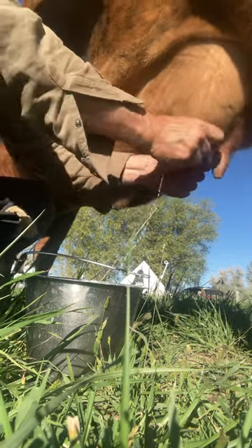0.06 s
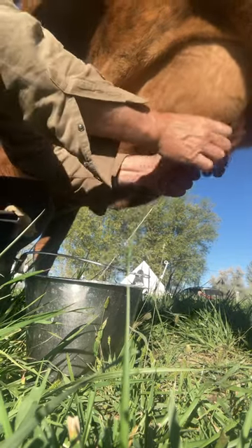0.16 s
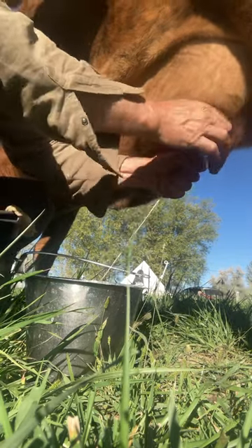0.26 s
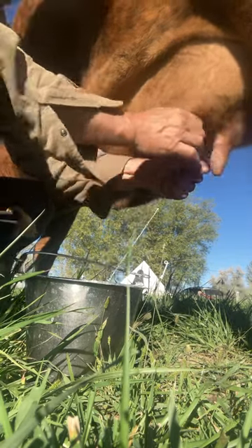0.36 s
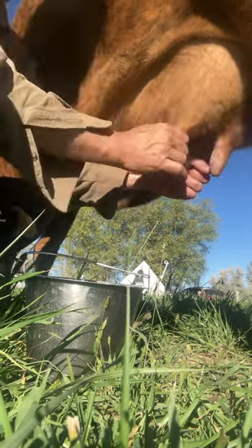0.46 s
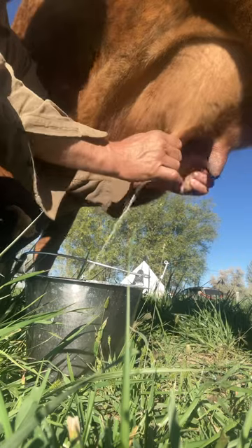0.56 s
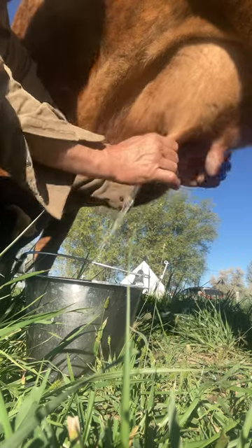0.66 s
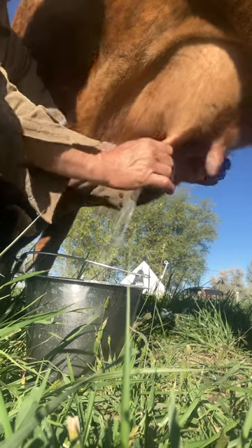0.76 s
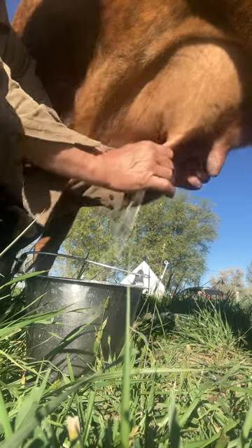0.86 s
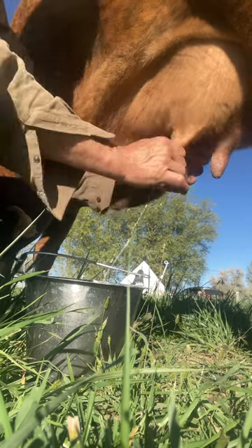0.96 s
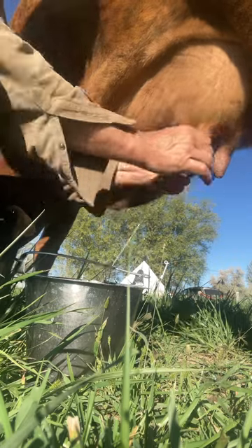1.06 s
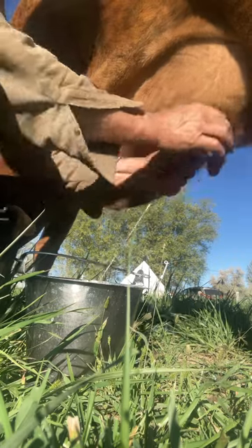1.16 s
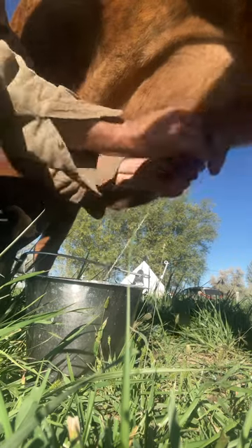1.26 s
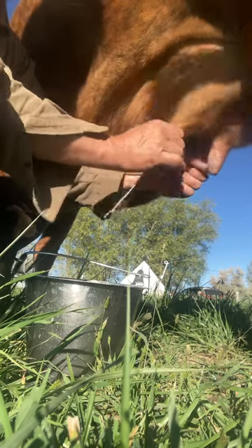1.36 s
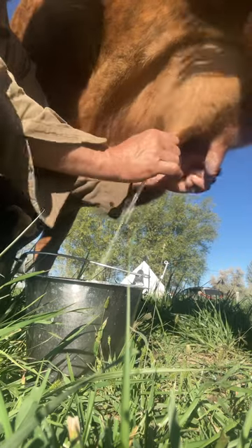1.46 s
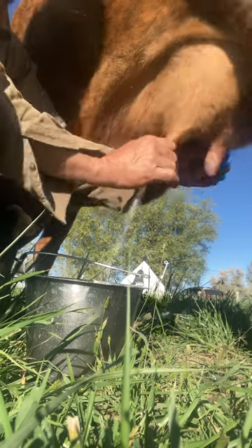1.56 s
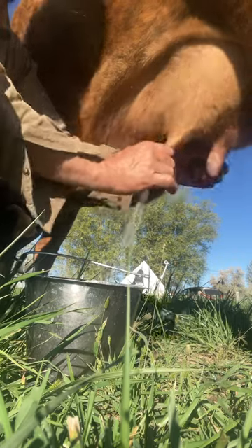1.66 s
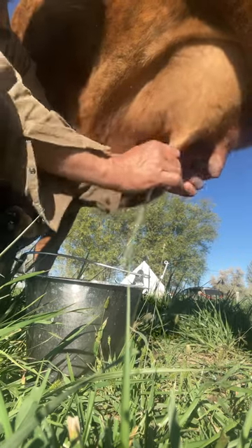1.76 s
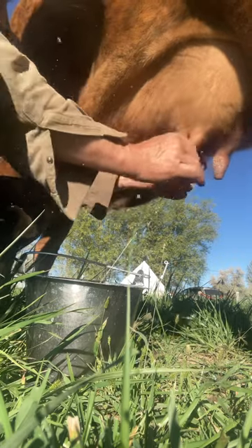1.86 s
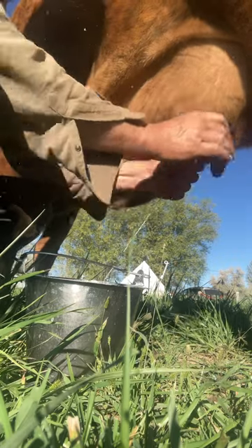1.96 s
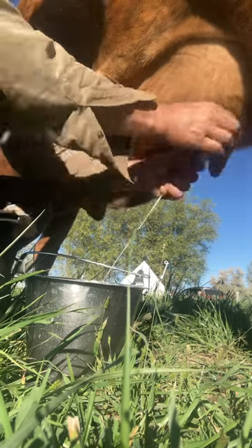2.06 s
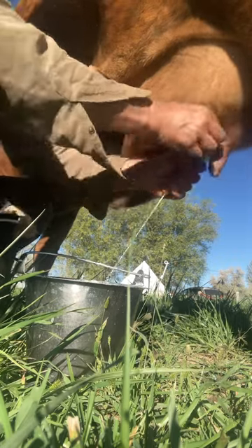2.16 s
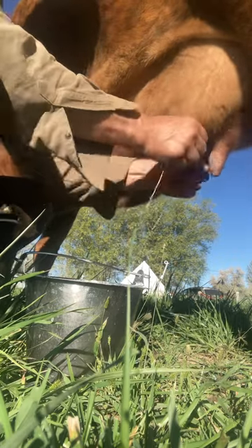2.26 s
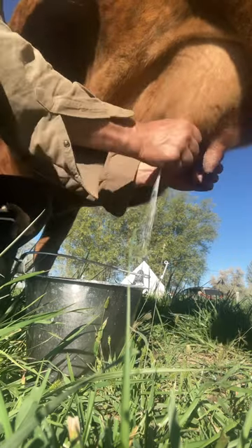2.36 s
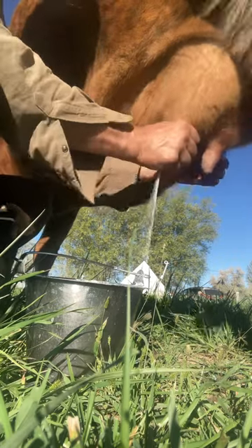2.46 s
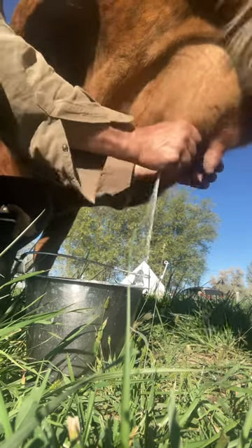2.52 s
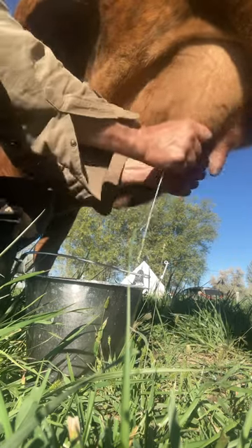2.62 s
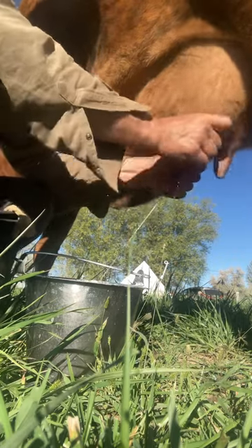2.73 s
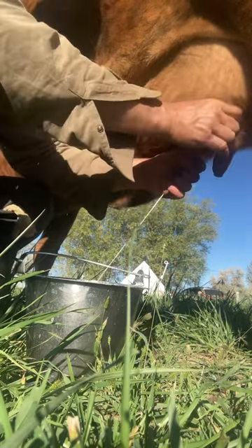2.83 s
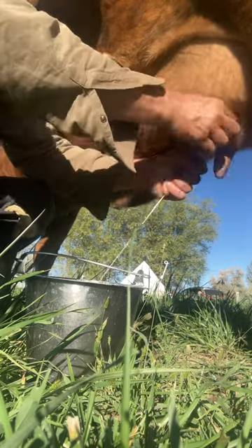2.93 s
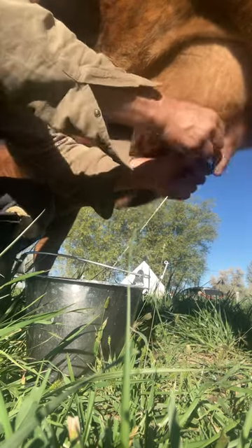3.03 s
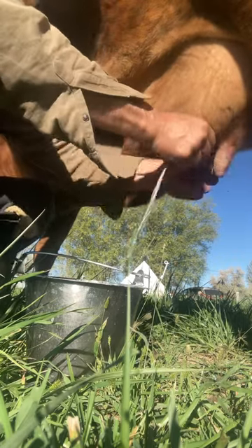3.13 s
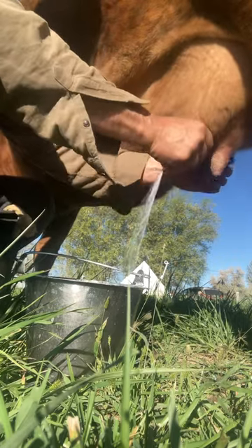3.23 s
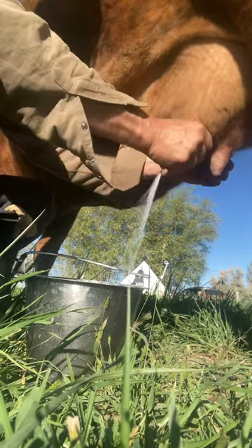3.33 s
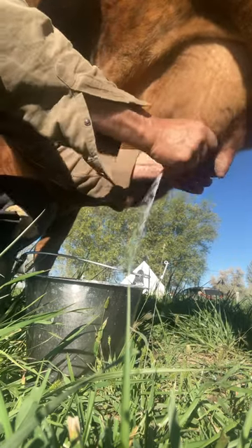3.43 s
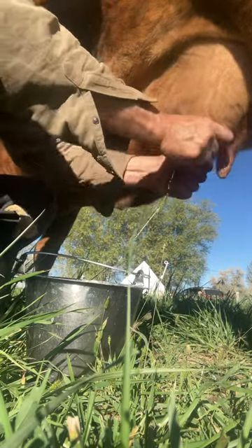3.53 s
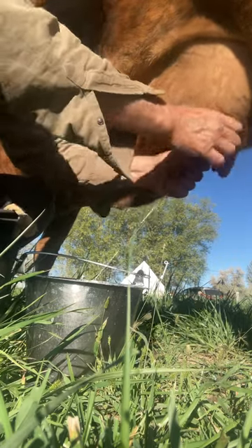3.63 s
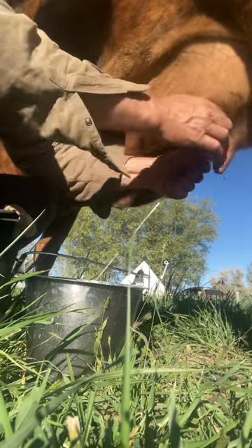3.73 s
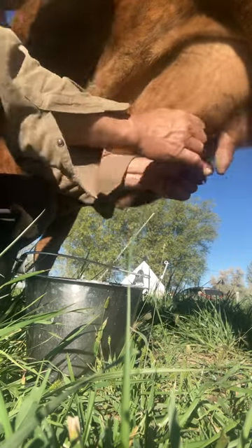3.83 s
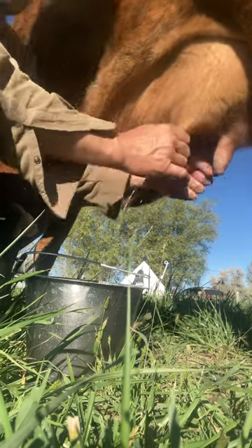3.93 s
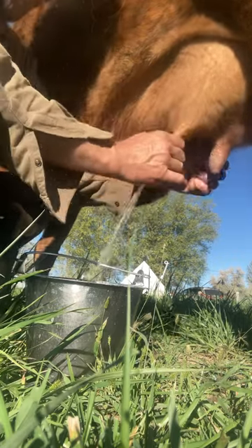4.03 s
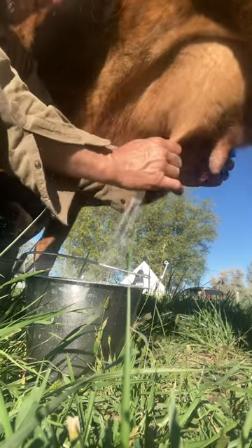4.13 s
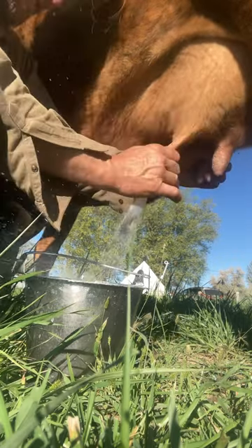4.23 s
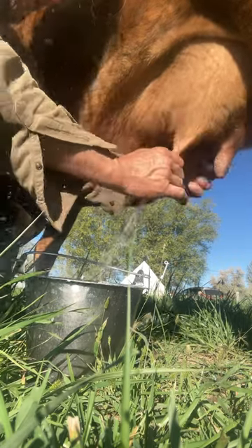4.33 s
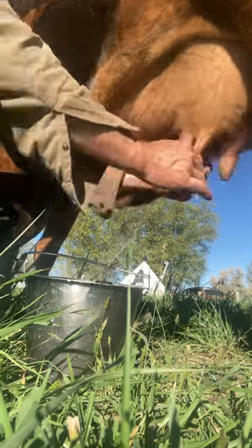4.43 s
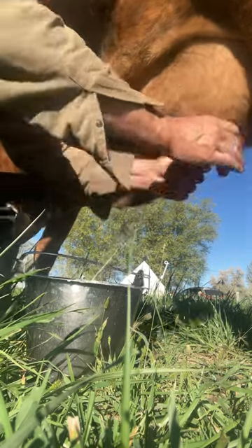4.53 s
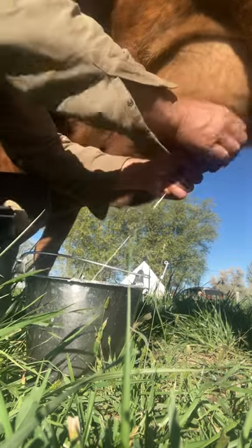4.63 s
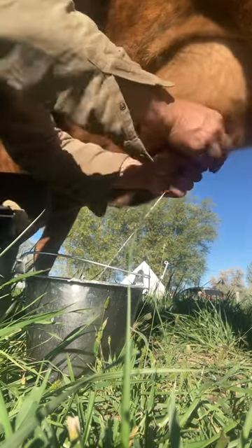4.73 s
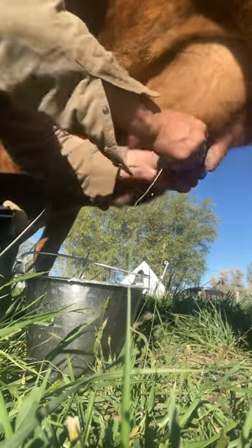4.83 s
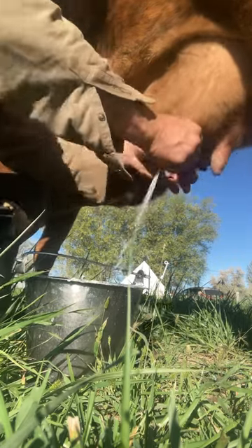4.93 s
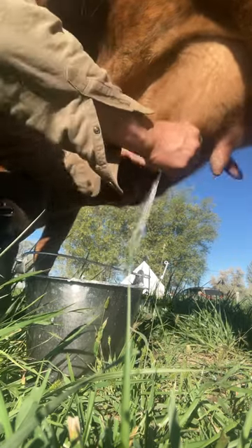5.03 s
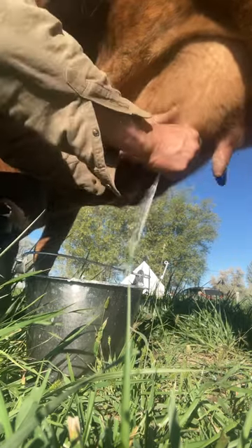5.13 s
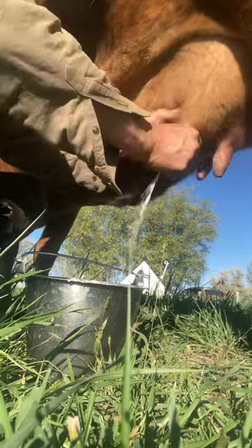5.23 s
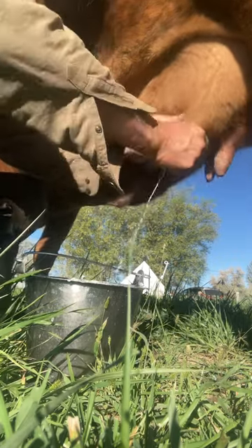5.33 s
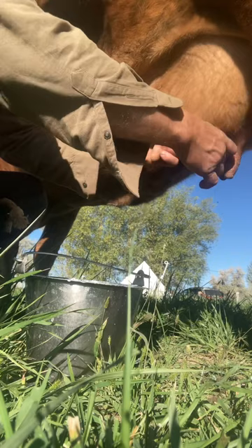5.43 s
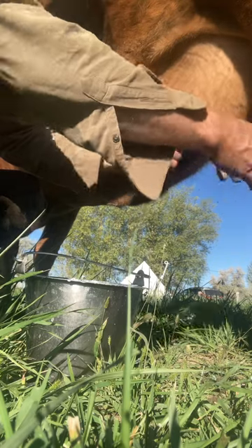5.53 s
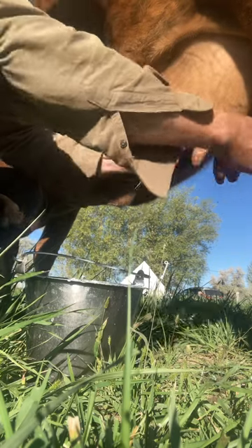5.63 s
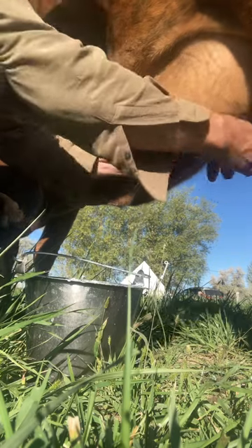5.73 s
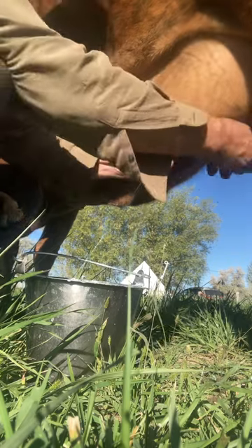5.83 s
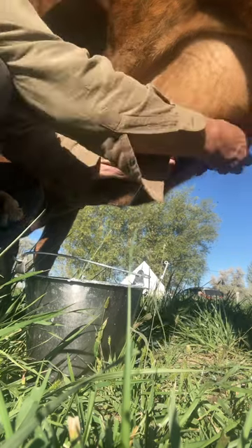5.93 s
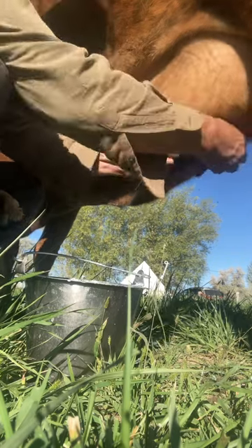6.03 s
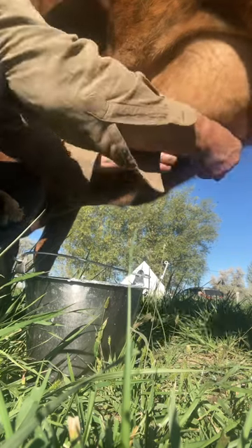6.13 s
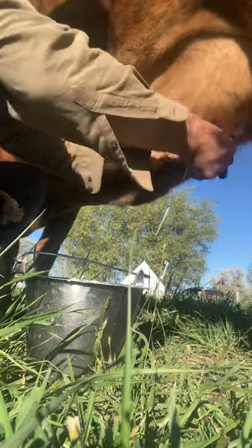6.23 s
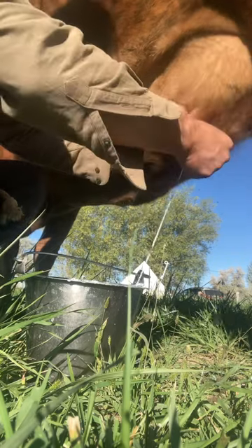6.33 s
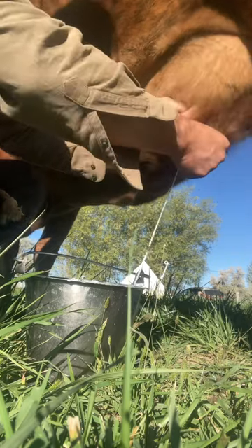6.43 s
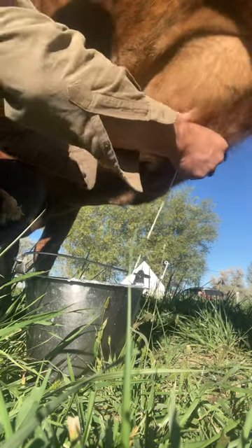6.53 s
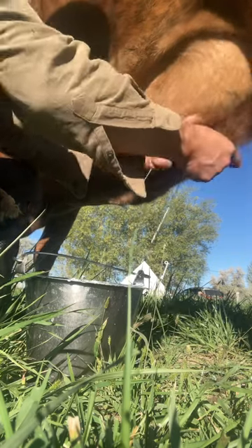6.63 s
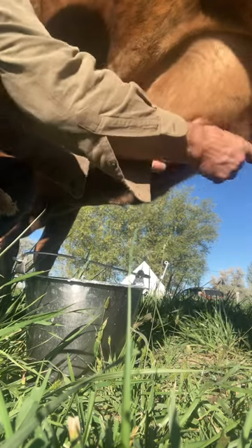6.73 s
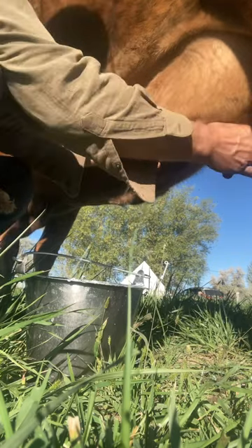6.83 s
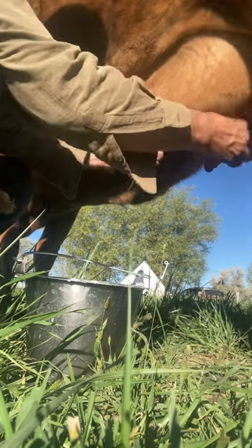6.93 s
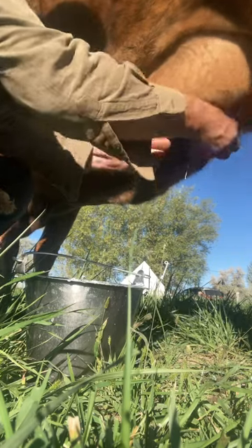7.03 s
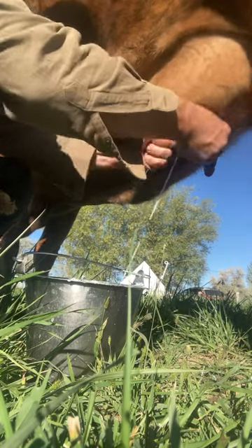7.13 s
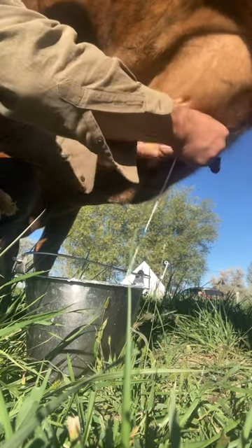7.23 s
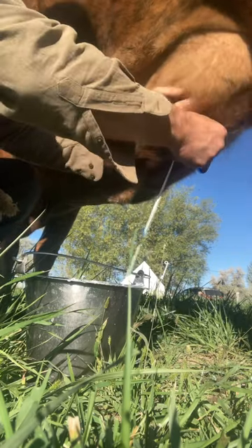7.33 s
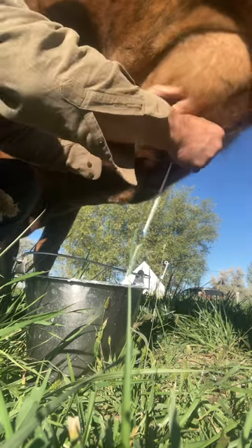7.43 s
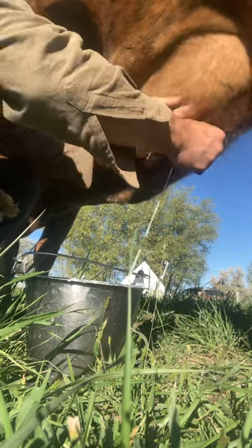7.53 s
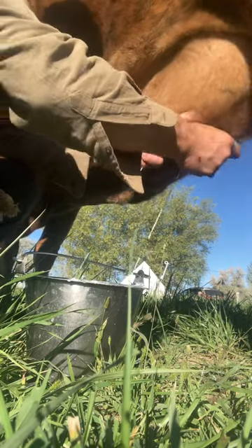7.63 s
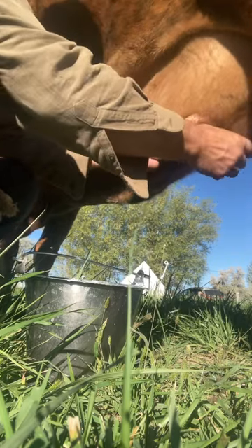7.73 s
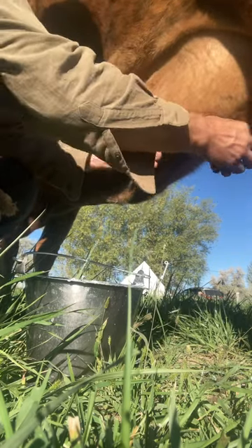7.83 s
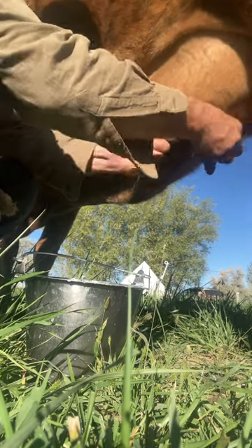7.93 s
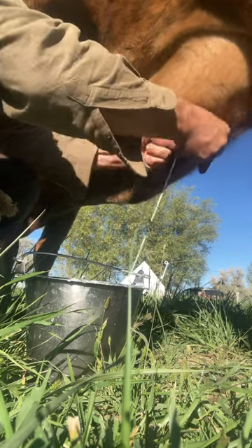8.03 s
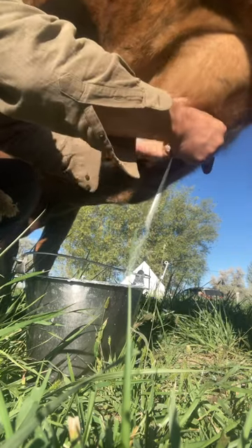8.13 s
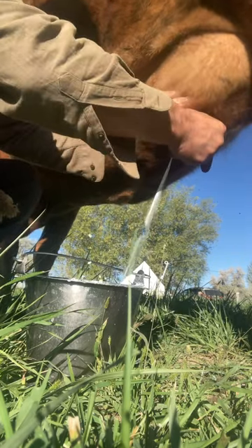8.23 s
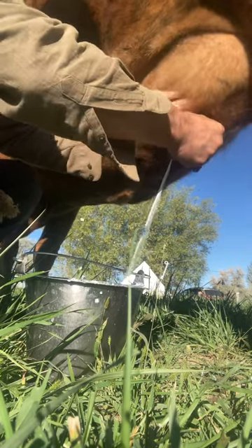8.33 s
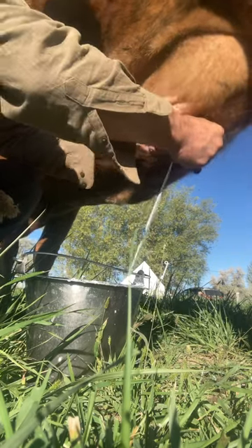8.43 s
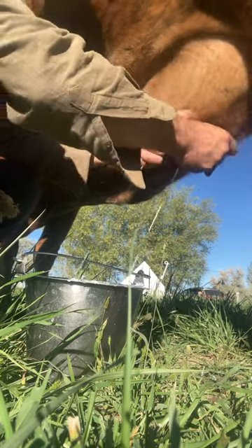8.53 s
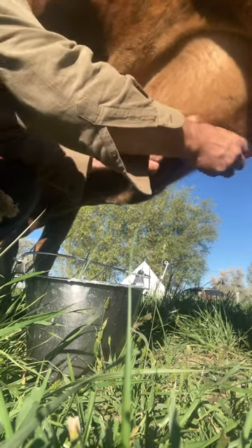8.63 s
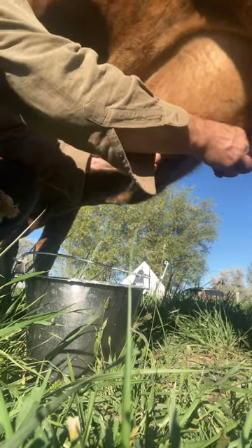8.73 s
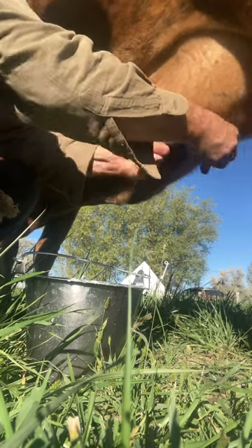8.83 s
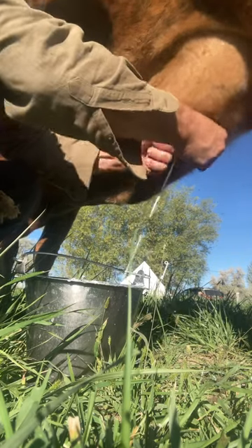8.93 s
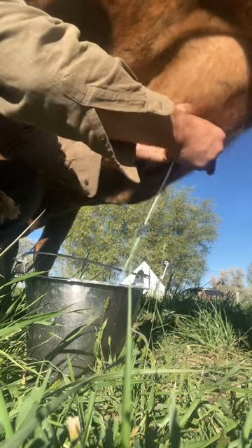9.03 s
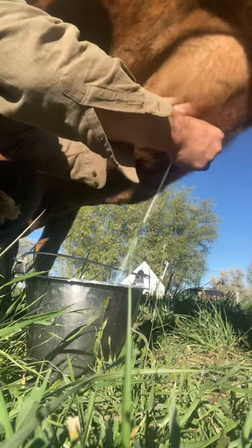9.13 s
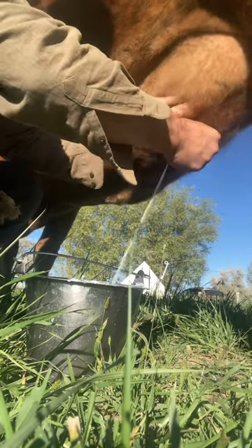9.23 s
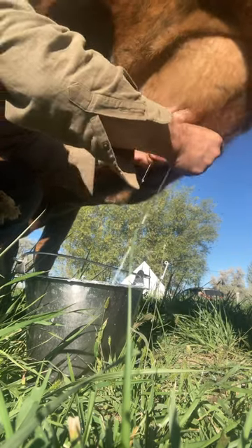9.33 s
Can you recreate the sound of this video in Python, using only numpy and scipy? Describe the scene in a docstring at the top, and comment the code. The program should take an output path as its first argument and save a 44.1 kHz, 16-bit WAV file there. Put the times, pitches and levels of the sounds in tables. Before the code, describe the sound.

Streams of milk squirt in steady alternating pulls into a metal pail, hissing and splashing, over a faint low outdoor rumble.

```python
"""Hand milking on a pasture

A cow is milked by hand into a steel pail, heard from a stereo microphone close by in the grass.
The two hands take turns: each jet breaks into noisy drops that drum the pail, ring its hollow and fizz,
and into damped pings of bubbles. Each pull swells as the fist closes, holds and thins out;
a jet may surge, whistle, gulp air or throw fat drops, ticks and spatters.
Filtered noise makes the wind and far traffic underneath; they ease, then lift a little at the end."""
import sys
import numpy as np
from scipy import signal
from scipy.fft import rfft, irfft, next_fast_len
from scipy.io import wavfile
from scipy.ndimage import uniform_filter1d, map_coordinates

SR = 44100
rng = np.random.default_rng(int(sys.argv[2]) if len(sys.argv) > 2 else 0)


def to_wav(s):
    """Save 16-bit WAV."""
    ch = np.atleast_2d(s).T  # columns
    pcm = np.round(np.clip(ch, -1, 1) * 32767)  # PCM
    wavfile.write(sys.argv[1], SR, pcm.astype(np.int16))


N = 413216

# spots that the jets strike in the pail, by letter: [bubbles against patter/dB, patter rate/drops per s,
# missing pitch/Hz, depth of that notch/dB, ripple of the upper modes/factor, sputter/dB]
SPOTS = {"A": (-19.5, 600, 1452, 2, 1, 2.7), "B": (-22.5, 1603.5, 1266, 5, 0.96, 1.5),
         "C": (-17.5, 545, 1380, 2, 1, 1.2), "D": (-14.5, 379.5, 1350, 4, 1.15, 2),
         "E": (-14, 422, 1437, 14, 0.96, 2), "F": (-16, 451, 1450, 2.5, 1, 1.8),
         "G": (-16.5, 480.5, 1266, 3, 0.88, 1.4)}
# colour of the fine spray: [f/Hz, gain/dB]
SPRAY_COLOUR = [(1500, -40), (3500, -13), (5200, -3), (6800, 0), (8000, -2), (10000, -3.5), (13000, -7),
                (15500, -10.5)]
TOP_HZ = 15740  # upper edge of the sound, and pivot of the spray's tilt


def amp(db):
    """Decibels to gain."""
    return 10 ** (np.asarray(db) / 20)


def unit(x):
    """x scaled to rms 1."""
    return x / np.sqrt(np.mean(x ** 2) + 1e-20)


def along(points, hz, axis=1):
    """One column of a table of (f/Hz, ..) rows, read on a log frequency axis."""
    table = np.transpose(points)
    return np.interp(np.log(hz + 1), np.log(table[0]), table[axis])


def curves(rows, t):
    """Each column after the time, read at the times t."""
    s, *columns = np.transpose(rows)
    return [np.interp(t, s, column) for column in columns]


def wobble(rate, size):
    """A smooth random curve with rate knots a second."""
    knots = rng.standard_normal(int(size * rate / SR) + 4)
    return map_coordinates(knots, [np.arange(size) * rate / SR])


def filtered(x, response):
    """x times a complex response of frequency."""
    size = x.shape[-1]
    padded = next_fast_len(size + SR // 10)
    spectrum = rfft(x, padded) * response(np.fft.rfftfreq(padded, 1 / SR))
    return irfft(spectrum, padded)[..., :size]


def ring(x, gain, size=4096):
    """x through the causal, minimum-phase filter with the given gain over frequency, at rms 1."""
    cepstrum = irfft(np.log(gain(np.fft.rfftfreq(size, 1 / SR)) + 1e-6))
    # folding the cepstrum onto positive times makes the filter causal
    cepstrum[1:size // 2] *= 2
    cepstrum[size // 2 + 1:] = 0
    impulse = irfft(np.exp(rfft(cepstrum)))
    return unit(signal.fftconvolve(x, impulse)[:len(x)])


def noise(spectrum):
    """Steady coloured noise of rms 1."""
    return unit(filtered(rng.standard_normal(N), lambda hz: amp(along(spectrum, hz))))


def add(track, s, sound):
    """Mix a sound into the track at time s."""
    part = track[max(round(s * SR), 0):][:len(sound)]
    part += sound[:len(part)]


def drops(rate, spread_db, wash_db, size):
    """Impacts of uneven size at random moments, over the smooth wash of the unbroken jet; rms 1."""
    hits = (rng.random(size) < rate / SR) * rng.choice([-1, 1], size)
    sizes = amp(spread_db * np.clip(rng.standard_normal(size), -2, 2))
    wash = rng.standard_normal(size)
    return unit(unit(hits * sizes) + amp(wash_db) * wash)


def bubbles(rate, centre_hz, octaves, cycles, spread_db, size):
    """Damped pings of bubbles of many sizes, up to octaves either side of the centre; rms 1."""
    chance = rng.random((int(rate * size / SR) + 1, 3))
    when, pitch, strength = chance.T[:, :, None]
    t = np.arange(SR // 50) / SR
    turns = centre_hz * 2 ** (octaves * (2 * pitch - 1)) * t
    envelope = np.exp(-turns / cycles) * (1 - np.exp(-turns))
    pings = amp(spread_db * strength ** 2) * envelope * np.sin(2 * np.pi * turns)
    index = (when * size).astype(int) + np.arange(len(t))
    return unit(np.bincount(index.ravel(), pings.ravel(), size)[:size])


def outdoors():
    """A low traffic drone and soft gusts that swell at random, and the faint hiss of open air."""
    # colours of far traffic, wind and open air: [f/Hz, gain/dB] each
    traffic_colour, wind_colour, air_colour = [(20, -31), (30, -41), (42, -5.5), (52, -11.5), (60, 7),
                                               (67, 7.5), (80, 0), (100, -6), (130, -12), (250, -63)], [(60, -22), (100, 3.5), (150, 0), (168, -4),
                                                               (187, 2.5), (215, -11.5), (250, -12),
                                                               (300, -9.5), (440, -13), (520, -20),
                                                               (620, -33), (1200, -35), (3000, -74)], [(300, -1), (700, 4), (1150, 8),
                                                                             (1500, -27), (2200, 9),
                                                                             (4000, -1), (10000, -4),
                                                                             (15000, -40)]
    # course of the two levels, before swells and trims: [t/s, rumble level/dB, wind level/dB]
    levels = [(0, -41, -43.5), (0.2, -41.5, -40.5), (0.6, -39, -44.5), (1.2, -41, -43), (1.6, -38, -44),
              (2.4, -43.5, -47.5), (3.3, -43, -50.5), (3.7, -42, -50.5), (4.1, -44, -55), (4.8, -43, -51),
              (5.3, -47, -53), (6.1, -45.5, -52), (6.35, -47, -48.5), (6.9, -47, -54.5), (7.4, -49.5, -50),
              (7.9, -47.5, -49.5), (8.8, -48, -50.5), (9.37, -43.5, -46)]
    swells_per_s = 5.9
    rumble_db, wind_db = curves(levels, np.arange(N) / SR)
    rumble_db = rumble_db + 1.0 + 1.4 * wobble(swells_per_s, N)
    wind_db = wind_db - 0.57 + 1.38 * wobble(swells_per_s, N)
    drone = noise(traffic_colour)
    # the drone is steadier than plain noise
    swell = np.sqrt(np.abs(uniform_filter1d(drone ** 2, size=SR // 12)) + 1e-6)
    drone = unit(drone / swell ** 0.22)
    air = amp(-82.5) * noise(air_colour)
    return amp(rumble_db) * drone + amp(wind_db) * noise(wind_colour) + air


def milking():
    """The hands take turns; splash and spray follow the pressure of each pull."""
    # one pull of a teat, or the weak trickle of last drops at 5.3 s:
    # [start t/s, length/s, squeeze/s, release/s, splash level/dB, spray level/dB,
    # spray tilt/dB per octave, drumming and churn against the splash/dB, spot struck]
    jets = [ (0, 0.58, 0.0057, 0.27, -59, -60.5, -5.5, -3, -26, "A"),
            (.485, 0.46, 0.15, 0.21, -54.5, -55.5, -4.5, -18, -18, "B"),
            (.924, 0.54, 0.075, 0.24, -58, -62, -2.5, 2.5, -8, "A"),
            (1.35, 0.51, 0.17, 0.26, -52, -54.5, 2.5, -13, -31, "B"),
            (1.774, 0.54, 0.11, 0.19, -61.5, -63, -5, 4, -9, "F"),
            (2.264, 0.5, 0.12, 0.23, -55.5, -58, -1.5, -4.5, -12.5, "B"),
            (2.644, 0.54, 0.091, 0.34, -59.5, -61, -4.5, 5, -4.5, "F"),
            (3.045, 0.54, 0.21, 0.26, -53, -57, -1, -8, -12, "B"),
            (3.508, 0.54, 0.087, 0.3, -59.5, -64, -2, 6.5, -5, "F"),
            (3.94, .45, 0.29, 0.14, -53, -55, 1, -8, -16, "B"),
            (4.364, 0.44, 0.46, 0.21, -50.5, -52.5, -4.5, -2.5, -15, "C"),
            (4.84, 0.57, 0.32, 0.37, -52, -57, -3, -5.5, -10.5, "B"),
            (5.3, 0.53, .03, .08, -78.5, -80, -5.5, -9, -18, "C"),
            (5.6, 0.44, 0.24, 0.25, -53.5, -54, -5.5, -7, -16, "C"),
            (6.149, .587, 0.17, 0.32, -54, -55.5, -5.5, -1, -5.5, "D"),
            (6.615, 0.45, 0.54, 0.21, -51, -53, -1, -15, -27, "E"),
            (7.068, 0.63, 0.17, 0.18, -52.5, -57, -2, -3.5, -8, "D"),
            (7.61, 0.34, 0.048, 0.058, -54.5, -53, -5.5, -11.5, -22, "E"),
            (7.943, 0.66, 0.15, 0.26, -53.5, -55.5, -2.5, -3.5, -14, "G"),
            (8.481, .36, 0.11, 0.13, -55, -54.5, -6, -4.5, -8, "E"),
            (8.855, 0.56, 0.1, 0.17, -51, -55.5, 0, -5, -26, "G")]
    open_s = .012  # time constant of the opening teat
    # a full jet flutters a little, a thinner one more for each dB below the full jet
    flutter_base_db, flutter_grows, full_jet_db = 0.48, 0.18, -59.5
    track = np.zeros(N)
    for start, length, squeeze, release, splash_db, spray_db, tilt_db, drum_db, churn_db, spot in jets:
        t = start + np.arange(int(length * SR)) / SR
        jet_db = pressure(t, start, length, squeeze, release)
        thinness_db = np.clip(full_jet_db - splash_db, 0, 10)
        flutter_db = (flutter_base_db + flutter_grows * thinness_db) * wobble(36.0, len(t))
        splash_surge_db, spray_surge_db = surges(t) + flutter_db
        splash_course_db = splash_db + jet_db + splash_surge_db
        spray_course_db = spray_db + jet_db + spray_surge_db
        sound = squirt(splash_course_db, spray_course_db, tilt_db, drum_db, churn_db, spot)
        opening = 1 - np.exp((start - t) / open_s)
        edges = np.sqrt(signal.windows.tukey(len(t), .04))
        add(track, start, sound * opening * edges)
    return track


def pressure(t, start, length, squeeze, release):
    """Strength of the jet (dB) as the fist closes, holds and lets go."""
    first_db, last_db = 14, 27  # how far the jet's first and last moments lie under its full strength
    closing = np.clip(1 - (t - start) / squeeze, 0, 1)
    opening = np.clip(1 - (start + length - t) / release, 0, 1)
    return -first_db * closing ** 2 - last_db * opening ** 2


def surges(t):
    """Gains (dB) of splash and spray from brief surges and dips of the jet, each a short bell."""
    # surges, negative for a dip: [centre t/s, width between 1/e points/s, splash gain/dB, spray gain/dB]
    spurts = [(0.166, 0.018, 6, 8), (.35, 0.22, 1.5, 7.5), (.54, 0.11, 1.5, -3.5), (1.0, 0.022, 4.5, 6),
              (1.25, 0.098, -7, 3), (1.115, 0.066, -0.5, -0.5), (1.875, 0.028, 8.5, 11.5),
              (2.5, 0.062, -1.5, 3), (4.07, 0.08, 7, 7), (4.17, .12, 0, 3), (4.6, 0.11, 3, 1.5),
              (5.34, 0.084, -1, 6.5), (5.6, 0.024, 6, 7), (5.68, 0.19, -2, 3), (6.233, 0.018, 9, 10),
              (6.327, 0.024, 6, 4), (6.466, 0.028, 11, 6), (6.545, 0.01, 5, 4), (6.696, 0.053, 9, 3.5),
              (6.92, 0.071, 6, 1), (7.1, 0.025, 3, -5), (7.14, 0.036, 6, 7), (8.037, 0.014, 6, 8.5),
              (8.185, 0.056, 4, 1.5)]
    return sum(np.outer(gains_db, np.exp(-(2 * (t - s) / width) ** 2)) for s, width, *gains_db in spurts)


def squirt(splash_db, spray_db, tilt_db, drum_db, churn_db, spot):
    """One sputtering jet striking a spot in the pail, with the given courses of splash and spray."""
    # colour of the drumming bottom of the pail: [f/Hz, gain/dB]
    bottom_colour = [(100, -28), (180, -1), (250, -7.5), (310, -3.5), (370, -2.5), (440, 2.5), (510, -6),
                     (590, -14), (800, -54)]
    bubble_db, drop_rate, null_hz, null_db, ripple, sputter_db = SPOTS[spot]
    size = len(splash_db)
    # the jet arrives in quick clumps
    sputter = amp(sputter_db * wobble(200, size) + .8 * wobble(45, size))
    # large drops ring the hollow, mixed with the bubbles that they drive under
    patter = drops(drop_rate, spread_db=1, wash_db=0, size=size)
    driven = bubbles(rate=250, centre_hz=2500, octaves=1, cycles=10, spread_db=14, size=size)
    blows = patter + amp(bubble_db) * driven
    rung = ring(blows * sputter, lambda hz: hollow(spot, hz))
    splash = overtones(rung, ripple, spacing_hz=180, shifts=16, glide=.014)
    # single droplets crack on the surface
    crackle = bubbles(rate=220, centre_hz=3200, octaves=1, cycles=3.5, spread_db=16, size=size)
    splash = unit(splash + amp(-11) * crackle)
    # fine droplets and bursting froth hiss above it
    fine_drops = drops(4 * drop_rate, spread_db=4.5, wash_db=-1.5, size=size)
    mist = (fine_drops + amp(-5.5) * patter) * sputter

    def spray_gain(hz):
        tilt = tilt_db * np.log2((hz + 1) / TOP_HZ)
        return amp(along(SPRAY_COLOUR, hz) + upper(spot, hz) + tilt)

    hiss = ring(mist, spray_gain)
    spray = overtones(hiss, ripple, spacing_hz=170.3, shifts=16.2, glide=0.008)
    # the weight of the jet drums on the bottom
    thuds = drops(drop_rate / 2, spread_db=6.0, wash_db=-13.5, size=size)
    drum = ring(thuds, lambda hz: amp(along(bottom_colour, hz)))
    # larger bubbles, dragged down, sound through the hollow
    churn = bubbles(rate=220, centre_hz=760, octaves=0.592, cycles=14.0, spread_db=11, size=size)
    gurgle = ring(churn, lambda hz: hollow(spot, hz))
    # the deep sounds follow the steady flow and miss its brief spurts
    flow_db = uniform_filter1d(splash_db, size=SR // 10)
    deep = amp(drum_db) * drum + amp(churn_db) * gurgle
    sound = amp(splash_db) * splash + amp(np.minimum(flow_db, splash_db)) * deep
    sound = sound + amp(spray_db) * atomised(spray, spray_db)
    # the spot lies on a node of one standing wave, so that pitch is weak
    return filtered(sound, lambda hz: amp(-null_db / (1 + ((hz - null_hz) / 85) ** 2)))


def hollow(spot, hz, broad_db=-12):
    """Gain of the pail struck at a spot: its main resonances over a broad splash."""
    # broad colour of the splash, before broad_db: [f/Hz, gain/dB]
    splash_colour = [(350, -39), (700, 4), (1400, 2.5), (2500, 8), (4500, 2.5), (6000, 5), (9000, -13),
                     (16000, -70.5)]
    # resonances of the pail: [f/Hz, half-width at half amplitude/Hz, gain at spots A to G/dB (seven columns)]
    pail_modes = [(723, 110, 7.5, -6.5, -2, 0, 8.0, 6.0, 2), (1076, 130, -2, -9, -18.0, 0, -21, -6, 0.5),
                  (1207, 88, 11.5, -3.5, 3, -7.0, 11, 7, 0), (1470, 118.0, 1, -4.5, -10, -9, -3.0, -11, 5),
                  (1707, 140, 1.5, -0.5, -4, 1.5, 4.5, -2.0, 2),
                  (2004.0, 107, 6.5, -14, 6.5, -10.0, 15.0, 5.0, -5),
                  (2220, 94, -14.0, 1.5, 1.5, 4, -11, -20, 9.5), (2396, 91, 4.5, -23, 2, 2.5, 11, 2, -14.0),
                  (2750, 98, 6.0, -6, -4, 0, 5.0, -3, 3), (2986, 59, -14, -0.5, -8, 0, 11.0, 0.5, 6),
                  (3274, 116, 5, -0.5, -5.0, -2, 0, -10, 3.5),
                  (3710, 120, 0.5, -5.5, -8.0, 1.5, 2, -13.0, -1.0),
                  (3964, 170, 2, -4, -5, -5.0, 5.0, -5, -1),
                  (4500, 140, -17.0, -4, -17, -13.0, 2.0, -12.0, 3.0)]
    power = amp(broad_db + along(splash_colour, hz)) ** 2
    for centre, width, *strengths in pail_modes:
        strength_db = strengths[list(SPOTS).index(spot)]
        power = power + (amp(strength_db) / (1 + ((hz - centre) / width) ** 2)) ** 2
    return np.sqrt(power)


def upper(spot, hz, width_hz=170):
    """Lift or dip (dB) that the pail's high resonances give the spray at a spot."""
    # high resonances of the pail: [f/Hz, gain at spots A to G/dB (seven columns)]
    high_modes = [(5150, 3, -6.5, 2.5, -6, 1.5, -2, -0.5), (5400, -4.0, 0.5, -5, 2.5, 1.5, -3, 1.0),
                  (5940, 0, -7, -7, -9.5, 3, -6.0, -1), (6500, -7, -5, -0.5, -4, -2, -5, 0.0),
                  (7120, -0.5, 0.5, 1.5, -4, 0, 1.5, -2.0), (7570, -2.5, -2, -4, -1.5, -3.5, -0.5, -3.0)]
    index = list(SPOTS).index(spot)
    return sum(gains[index] / (1 + ((hz - centre) / width_hz) ** 2) for centre, *gains in high_modes)


def overtones(x, ripple, spacing_hz, shifts, glide):
    """The pail's crowded upper modes: a comb of peaks that slides and reforms as the jet wanders."""
    # depth of the comb, before the spot's ripple factor: [f/Hz, depth/dB]
    comb_depth = [(400, 0), (1000, 2), (1800, 4), (3500, 4.6), (5000, 5), (7500, 4.6), (11000, 3.6)]
    hz, t, z = signal.stft(x, SR, nperseg=512, noverlap=384)
    slide = 1 + glide * map_coordinates(rng.standard_normal(16), [t * 8], mode="nearest")
    rows = hz[:, None] * slide / spacing_hz
    # a random surface over pitch and time, with shifts columns a second
    columns = np.broadcast_to(t * shifts, rows.shape)
    comb = map_coordinates(rng.standard_normal((256, 48)), [rows, columns], mode="mirror")
    depth_db = ripple * along(comb_depth, hz)[:, None]
    combed = z * amp(depth_db * np.clip(comb, -2, 2))
    return unit(signal.istft(combed, SR, nperseg=512, noverlap=384)[1][:len(x)])


def atomised(spray, spray_db):
    """A slack jet makes less fine mist: the top of the spray fades faster than the rest."""
    fine_hz, fine_db, fine_grows = 9200, 0.55, 0.3  # edge of the mist, its gain, its further dB per dB
    fine = filtered(spray, lambda hz: 1 - 1 / (1 + (hz / fine_hz) ** 8))
    slack_db = np.minimum(spray_db - np.median(spray_db), 0)
    return spray - fine + amp(fine_db + fine_grows * slack_db) * fine


def whistles(width_hz=850, sputter_db=3.5):
    """A pinched jet sizzles in a narrow band whose pitch climbs as the opening closes."""
    # whistles: [start t/s, length/s, level/dB, first f/Hz, last f/Hz]
    pinches = [(.31, .11, -57, 5400, 7000), (.41, .18, -68.5, 6900, 7100), (1.19, .1, -62, 6000, 6400),
               (2.755, .18, -63.5, 7000, 7150)]
    track = np.zeros(N)
    for s, length, db, first_hz, last_hz in pinches:
        size = int(length * SR)
        phase = 2 * np.pi * np.cumsum(np.linspace(first_hz, last_hz, size)) / SR
        # two slow random curves on a gliding carrier make a band of noise
        band = wobble(2 * width_hz, size) * np.sin(phase) + wobble(2 * width_hz, size) * np.cos(phase)
        sizzle = unit(band * amp(sputter_db * wobble(151, size)))
        add(track, s, amp(db) * signal.windows.tukey(size, .5) * sizzle)
    return track


def slaps(rebound_db=-14, rise_per_s=1):
    """A fat drop cracks on the milk, leaves a ringing cavity of rising pitch, and scatters smaller drops."""
    # fat drops: [t/s, level/dB, cavity f/Hz, share of the cavity against the crack/0-1]
    fat_drops = [(0.5955, -37.5, 1800, .2), (1.0, -38, 3560, .5), (1.031, -43, 1280, .6),
                 (1.159, -43, 2640, .2), (1.534, -36.5, 2400, .2), (1.8622, -39, 3590, .3),
                 (2.579, -42, 3300, .3), (2.6374, -39.5, 2900, .3), (2.639, -42, 1780, .5),
                 (2.653, -43, 1700, .4), (2.677, -45.5, 1630, .6), (2.7008, -35, 1760, .5),
                 (2.7302, -41, 1610, .6), (3.5992, -43, 1700, .25), (4.0701, -35.5, 5920, .4),
                 (5.277, -46, 2750, .4), (5.9239, -38.5, 1960, .5), (6.2213, -32.5, 2400, .4),
                 (6.232, -37.5, 2700, .3), (6.323, -38.5, 1810, .3), (6.332, -37, 3300, .2),
                 (6.4572, -38, 2430, .3), (6.498, -41, 2700, .25), (6.543, -40, 3400, .2),
                 (6.683, -39, 3100, .2), (6.697, -37.5, 2080, .6), (6.9182, -34.5, 2950, .5),
                 (6.944, -43.5, 1230, .65), (7.1312, -36.5, 2070, .4), (7.148, -37, 2500, .3),
                 (7.7218, -30.5, 2990, .6), (7.766, -41, 2070, .7), (7.806, -39, 1940, .7),
                 (7.9894, -41, 1400, .4), (8.0296, -38, 3220, .4), (8.4966, -40, 2040, .4),
                 (8.5295, -35.5, 2340, .45), (8.604, -43, 740, .8), (8.634, -41, 2530, .6),
                 (8.8662, -44, 2990, .4), (8.9341, -32, 2240, .55), (8.942, -36, 2900, .4),
                 (8.964, -38.5, 3000, .6)]
    track, t = np.zeros(N), np.arange(SR // 16) / SR
    for s, db, pitch_hz, share in fat_drops:
        burst = rng.standard_normal(len(t)) * (amp(-60 * t / 0.003) + amp(rebound_db - 60 * t / 0.075))
        # the crack is strongest around the pitch of the cavity
        crack = ring(burst, lambda hz: 1 / (1 + (np.log2((hz + 1) / pitch_hz) / .65) ** 4))
        tone = np.sin(2 * np.pi * pitch_hz * t * (1 + rise_per_s * t))
        cavity = tone * amp(-60 * t / .042) * (1 - np.exp(-t / .0006))
        add(track, s, amp(db) * ((1 - share) * crack / np.abs(crack).max() + share * cavity))
    return track


def spatters(rise_s=0.00079):
    """Clumps of fine droplets, flung as a jet starts, breaks or stops, land as a short, bright crackle."""
    # clumps: [t/s, level before the decay/dB, t60/s]
    clumps = [(0.601, -44, .03), (1.19, -50, .015), (1.269, -49, .025), (1.35, -52, .012),
              (1.661, -47, .025), (3.529, -54, .05), (3.572, -52, .05), (3.9519, -47, .025),
              (4.0557, -41, .015), (4.853, -60, .04), (6.4707, -44, .03), (7.0763, -53, .04),
              (7.1177, -49, .025), (7.1327, -43, .025), (7.9698, -47, .025), (8.867, -52, .04)]
    track, t = np.zeros(N), np.arange(SR // 16) / SR
    for s, db, t60 in clumps:
        droplets = drops(4000, spread_db=4, wash_db=-6, size=len(t))
        grit = ring(droplets, lambda hz: amp(along(SPRAY_COLOUR, hz)))
        add(track, s, amp(db - 60 * t / t60) * (1 - np.exp(-t / rise_s)) * grit)
    return track


def ticks():
    """A drop on the bare steel wall rings its modes; the milk damps them at once."""
    # drops on the wall: [t/s, peak level/dB]
    wall_drops = [(0.9765, -37), (0.9775, -29.5), (0.992, -41)]
    # modes of the wall: [f/Hz, relative level/dB, t60/s]
    wall_modes = [(1270, -11, .03), (2190, -10, .013), (3020, -1, .012), (3560, -3, .017), (3850, -2, .009),
                  (4660, -6, .008), (5250, -9, .008)]
    track, t = np.zeros(N), np.arange(SR // 16) / SR
    for s, db in wall_drops:
        tick = np.zeros(len(t))
        for hz, level, t60 in wall_modes:
            tick += amp(level - 60 * t / t60) * np.sin(2 * np.pi * (hz * t + rng.random()))
        add(track, s, amp(db) * tick / np.abs(tick).max())
    return track


def gulps():
    """The jet plunges deep and gulps air: each plunge frees a short cluster of bubbles."""
    # plunges: [middle t/s, length/s, level before the fade/dB, central f/Hz]
    plunges = [(1.16, .12, -49, 325), (2.817, 0.088, -52, 332), (6.205, 0.05, -52, 520),
               (6.564, 0.074, -53, 328), (6.93, 0.1, -51, 390), (7.145, .09, -49, 351),
               (8.006, .06, -56.5, 780), (8.012, 0.06, -51.5, 1550), (8.897, .07, -48.5, 329)]
    track = np.zeros(N)
    for s, length, db, pitch_hz in plunges:
        size = int(length * SR)
        cluster = bubbles(rate=500, centre_hz=pitch_hz, octaves=0.585, cycles=5, spread_db=6, size=size)
        add(track, s - length / 2, amp(db) * signal.windows.cosine(size) * cluster)
    return track


def diffuse(x):
    """The same sound after scattering: its loudness and colour stay, its phases are lost."""
    z = signal.stft(x, nperseg=512)[2]
    scrambled = z * np.exp(2j * np.pi * rng.random(z.shape))
    return unit(signal.istft(scrambled, nperseg=512)[1][:N]) * np.std(x)


def scene():
    """Milk and pasture, spread between the ports of the stereo microphone by a filtered side signal."""
    # direct sound in the side signal against the mid: [f/Hz, level/dB, phase/rad]
    ports = [(60, -11, 2.9), (100, -5.5, 2.3), (200, 3, 2.9), (290, -1, 3.9), (390, -7.5, 3.6), (490, 6, 2),
             (560, 8, 1.5), (620, -1, 4.1), (790, -14, 4.7), (860, -4, 1.6), (1050, -6, 1.6),
             (1400, 2, 1.55), (1800, -3, 1.7), (3000, -2.5, 1.6), (4000, -13, 1.6), (5300, -10, 1.4),
             (7000, -30, 1.4)]
    # scattered sound in the side signal against the mid: [f/Hz, level/dB]
    scatter = [(60, -35), (130, -9.5), (220, -2.5), (400, -18), (500, 3.5), (600, 10.5), (780, -10.5),
               (1300, 1), (2200, -4), (3300, -5.5), (5500, -6), (6200, -20), (7000, -85)]
    mid = outdoors() + milking() + whistles() + slaps() + spatters() + ticks() + gulps()
    direct = filtered(mid, lambda hz: amp(along(ports, hz)) * np.exp(1j * along(ports, hz, axis=2)))
    # ground, grass and the cow's belly scatter part of the sound
    side = direct + diffuse(filtered(mid, lambda hz: amp(along(scatter, hz))))
    return np.array([mid + side, mid - side])


def record(dry):
    """The sound ends at TOP_HZ; nothing is kept above it."""
    return filtered(dry, lambda hz: hz < TOP_HZ)


dry = scene()
out = record(dry)
to_wav(out)
```